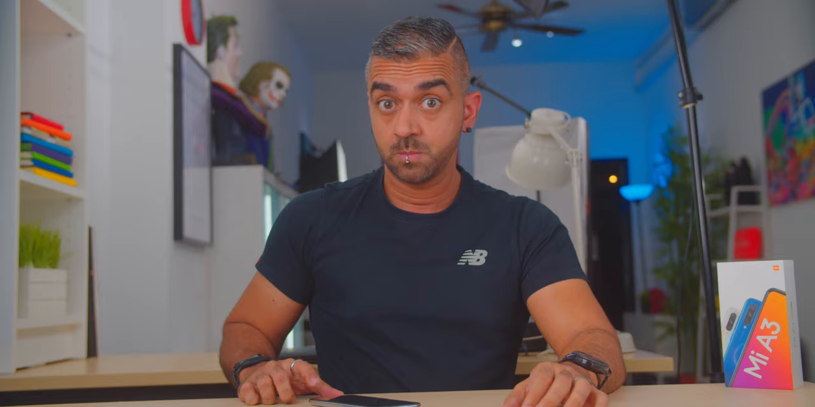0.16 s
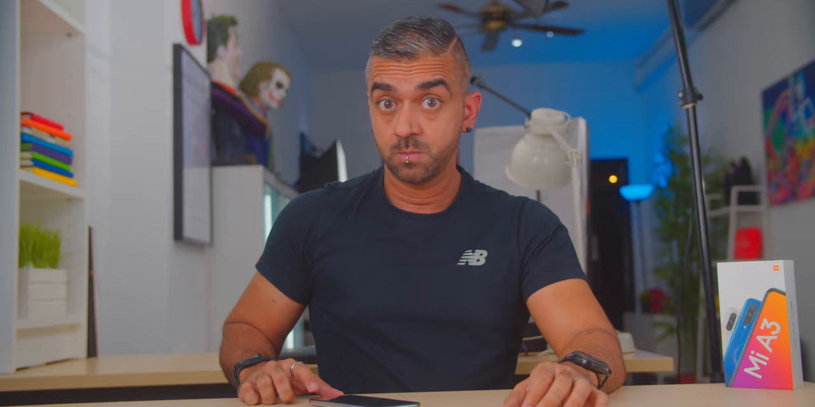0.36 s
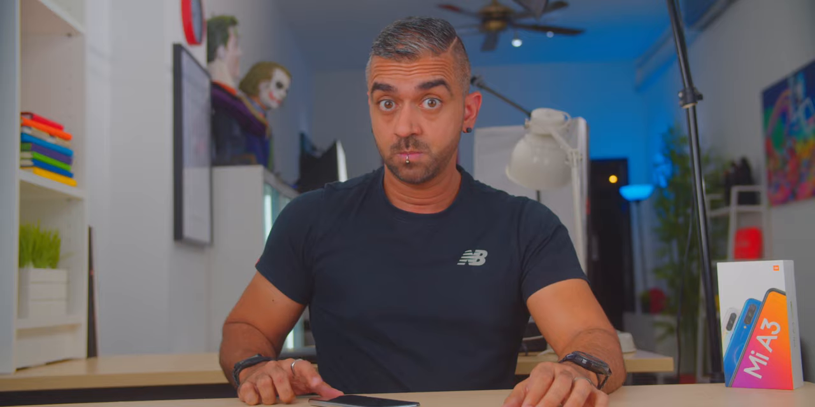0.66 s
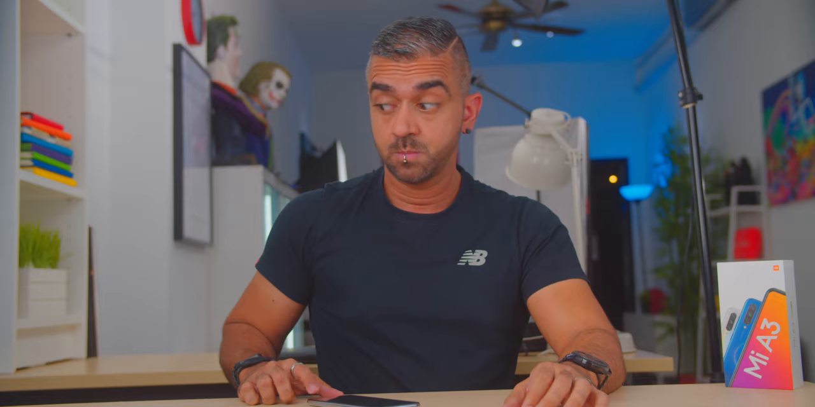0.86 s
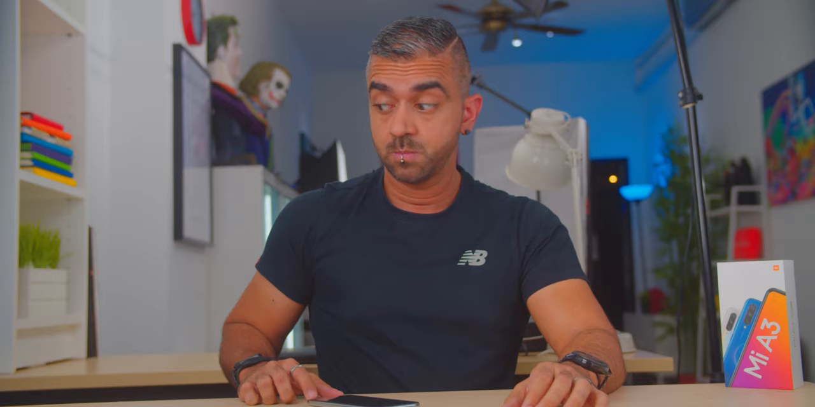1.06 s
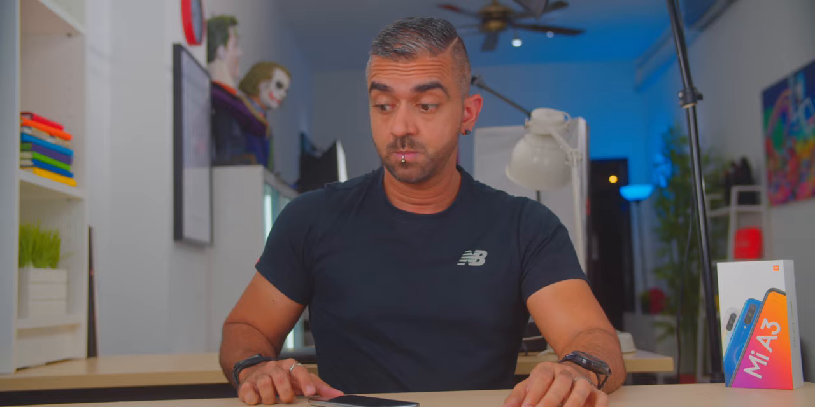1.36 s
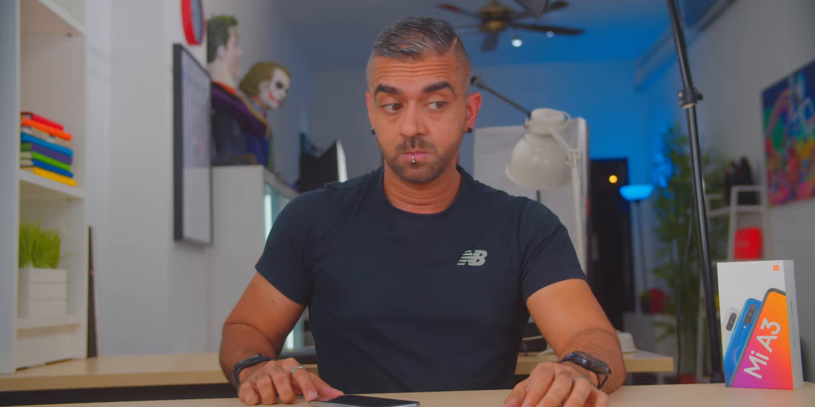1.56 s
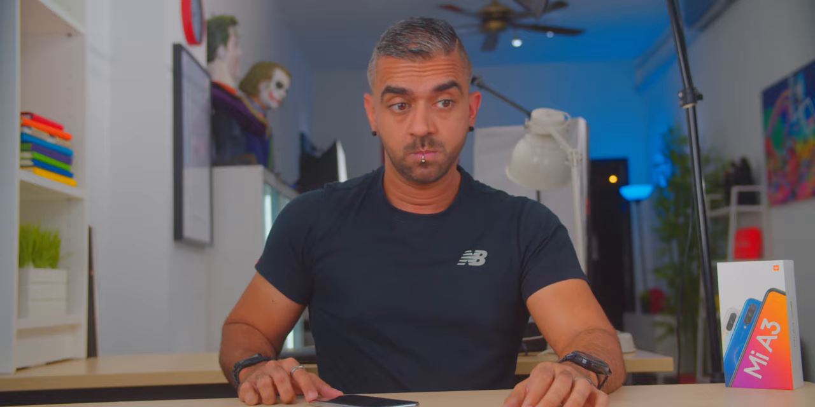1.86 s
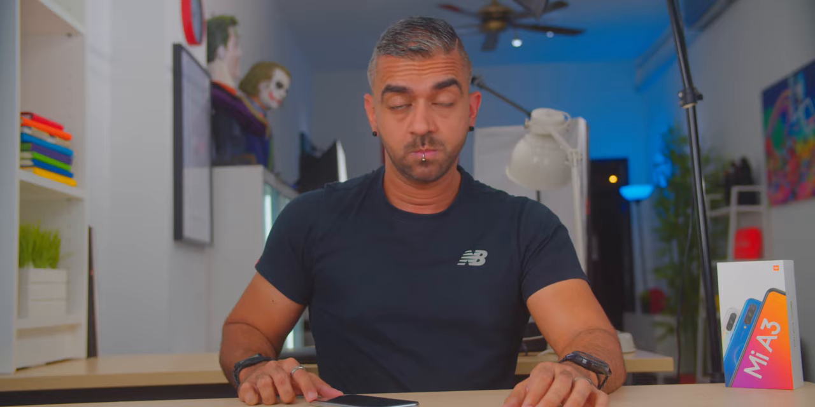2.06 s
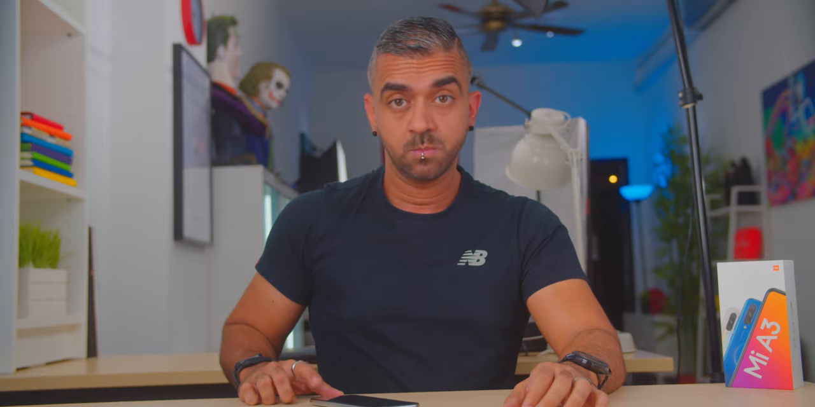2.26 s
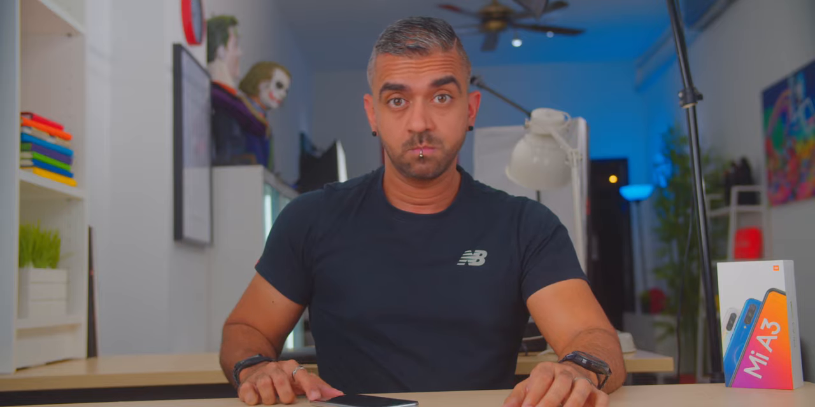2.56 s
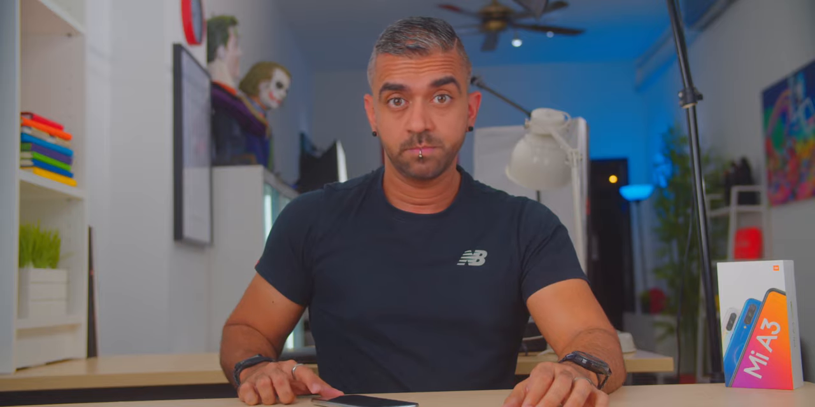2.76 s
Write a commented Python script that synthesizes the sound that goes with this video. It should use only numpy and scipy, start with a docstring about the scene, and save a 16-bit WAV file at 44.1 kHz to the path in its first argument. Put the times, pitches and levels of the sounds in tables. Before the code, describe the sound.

A phone wobbling on a wooden desk, heard close. Eleven bright, hard clacks fall almost evenly from 0.13 to 2.7 seconds, roughly every quarter second, slightly slower after 1.6. Each is followed about 0.03 seconds later by a softer, dull woody thud, sometimes with tiny ticks. The tail of an earlier knock opens it. A small furnished room echoes briefly over faint low rumble, hum and hiss.

```python
"""A phone lies on its camera bump on a wooden desk, close to the microphone, and a finger rocks it.
Each press leans on the desk, the free edge clacks down, and the other edge thuds back a moment later.
The desk top rings low and the phone shell clicks bright: both are sets of fading sine waves.
A small furnished room answers with fading noise, over a quiet floor of noise, hum and hiss."""
import sys
import numpy as np
from scipy import signal
from scipy.fft import rfft, irfft, next_fast_len
from scipy.io import wavfile

SR = 44100
rng = np.random.default_rng(int(sys.argv[2]) if len(sys.argv) > 2 else 0)


def attenuation_scalar(level_db):
    """Turn a level in dB into a linear amplitude multiplier (20 dB per decade)."""
    decades = np.asarray(level_db, float) / 20
    return 10 ** decades


def to_wav(sig):
    """Store sig (one row per channel, or 1-D mono) as 16-bit WAV at the path in sys.argv[1].

    Samples outside -1..1 are clipped; the rate is SR.
    """
    pcm = np.clip(np.atleast_2d(sig), -1, 1) * 32767
    pcm = np.round(pcm).astype(np.int16)
    wavfile.write(sys.argv[1], SR, pcm.T)  # frames by channels


N = 127890  # length in samples
PAD = SR // 4  # samples kept before the start, for blows whose tails are still heard
SCATTER_DB = 1  # how much the level of each ringing mode varies from blow to blow
CLACK_DESK_DB = 12  # extra desk ring in a clack; thuds send the room this much less


def along(points, hz):
    """Reads a curve of (pitch, value) points, with pitch on a log axis."""
    point_hz, value = np.transpose(points)
    return np.interp(np.log(hz + 1), np.log(point_hz + 1), value)


def push(length_s):
    """A smooth contact force that rises and falls; its samples add up to one."""
    force = np.hanning(max(round(length_s * SR), 1) + 2)
    return force / force.sum()


def ring(modes, scatter_db):
    """A struck body sounds as a sum of sine waves that each die away, with levels drawn anew."""
    t = np.arange(SR // 2) / SR
    pitch_hz, level_db, t60_s = np.transpose(modes)[:, :, None]
    level_db = level_db + scatter_db * rng.standard_normal(level_db.shape)
    fading = attenuation_scalar(level_db - 60 * t / t60_s)
    return (fading * np.sin(2 * np.pi * pitch_hz * t)).sum(0)


# ways the desk top rings: pitch_hz, level_db (relative), t60_s (time to fade by 60 dB)
DESK_MODES = [(60.6, -11.5, 0.31), (102.1, -16, 0.43), (139, -4, 0.05), (179.3, -14, 0.16),
              (224, -18.5, 0.53), (245.8, -4, 0.053), (267.4, -6, 0.14), (289, -22, 0.16),
              (325.3, -13.5, 0.32), (373.9, -13, 0.1), (436, -33, 0.094), (538.8, -14.5, 0.13),
              (652.6, -14, 0.13), (706, -18, 0.053), (1179, -11.5, 0.051), (1460, -8, 0.026),
              (1737, -18, 0.024)]


def desk_ring(force, scatter_db):
    """The wood's low ring, driven by a contact force: a longer push excites less treble."""
    return signal.fftconvolve(ring(DESK_MODES, scatter_db), force)


# ways the phone shell rings: pitch_hz, level_db (relative), t60_s (time to fade by 60 dB)
SHELL_MODES = [(1199, 9, 0.02), (2100, 0.5, 0.012), (3067, 5, 0.0045), (3340, 4.5, 0.0047),
               (3770, -28.5, 0.018), (5700, 6, 0.0045), (6354, -10, 0.014), (7560, 4, 0.0033),
               (9950, -15, 0.0051), (10540, 0.5, 0.0021), (11800, -44, 0.0065), (13500, -18, 0.013),
               (15300, -71, 0.0037)]


def shell_click(scatter_db):
    """The shell's bright ring after one contact; it builds up as the edge seats."""
    rise_s, shell_db = 0.0001, -4.5
    build_up = 1 - np.exp(-np.arange(SR // 2) / (rise_s * SR))
    return attenuation_scalar(shell_db) * ring(SHELL_MODES, scatter_db) * build_up


# how long the room rings: pitch_hz, t60_s (time to fade by 60 dB)
ROOM_FADE = [(60, 1), (200, 0.52), (500, 0.37), (1200, 0.58), (2500, 0.66), (6000, 0.6), (14000, 0.45)]
# how strongly the room answers a unit blow: pitch_hz, level_db (relative)
ROOM_COLOUR = [(40, 30), (100, 45), (250, 49), (400, 40.5), (700, 38.5), (1000, 32), (1400, 33), (2200, 23),
               (3300, 14.5), (4700, 7.5), (6000, 4.5), (9000, -4.5), (14000, -12)]


def room_tail():
    """Many mixed echoes act as noise in which each pitch dies at its own speed."""
    first_echo_s = 0.001915
    early_s, early_db = 0.053, 4  # extra dense echoes from things on and near the desk
    hz, t, z = signal.stft(rng.standard_normal(SR // 2), SR, nperseg=512)
    t60_s = along(ROOM_FADE, hz)[:, None]
    colour_db = along(ROOM_COLOUR, hz)[:, None]
    # the square root keeps the total energy independent of the fading time
    z = z * attenuation_scalar(colour_db - 60 * t / t60_s) * np.sqrt(6 * np.log(10) / (t60_s * SR))
    z = z * (1 + attenuation_scalar(early_db - 60 * t / early_s))
    tail = signal.istft(z, SR, nperseg=512)[1]
    return np.pad(tail, (round(first_echo_s * SR), 0))


def add(track, start_s, level_db, sound, room_force, room):
    """Lays a direct sound, and the room's answer to the force behind it, on the track."""
    same = 0.73  # share of the room's energy that repeats from blow to blow
    answer = np.sqrt(same) * room + np.sqrt(1 - same) * room_tail()
    for piece in sound, signal.fftconvolve(room_force, answer):
        part = track[round(start_s * SR) + PAD:][:len(piece)]
        part += attenuation_scalar(level_db) * piece[:len(part)]


# the free edge clacks down: start_s, level_db (relative), contact_s
CLACKS = [(0.1269, -32.5, 0.00037), (0.3704, -32.5, 0.0004), (0.614, -37, 0.0004), (0.8668, -32.5, 0.00031),
          (1.1253, -36, 0.00043), (1.3758, -35.5, 0.00033), (1.6404, -32.5, 0.00046), (1.928, -31, 0.00052),
          (2.2004, -34.5, 0.00047), (2.4599, -31, 0.00042), (2.707, -32, 0.00048)]
# one clack before the start, only its tail is heard: start_s, level_db (relative), contact_s
EARLIER_CLACK = (-0.19, -26.5, 0.00027)


def presses_and_clacks(track, room):
    """The finger loads the desk softly, then the edge strikes: desk and shell both ring."""
    press_lead_s, press_s, press_db = 0.0068, 0.0051, -8.5
    lead = round(press_lead_s * SR)
    press = attenuation_scalar(press_db) * push(press_s)
    for start_s, level_db, contact_s in [EARLIER_CLACK, *CLACKS]:
        blow = push(contact_s)
        force = np.zeros(lead + SR // 50)
        force[:len(press)] -= press
        force[lead:][:len(blow)] -= blow
        sound = attenuation_scalar(CLACK_DESK_DB) * desk_ring(force, SCATTER_DB)
        sound[lead:][:SR // 2] -= shell_click(SCATTER_DB)
        room_force = np.pad([1.], (lead, 0))  # the room answers the clack, not the press
        add(track, start_s - press_lead_s, level_db, sound, room_force, room)


# the other edge falls back softly: start_s, level_db (relative)
THUDS = [(-.097, -16.5), (0.153, -20.5), (0.3943, -17), (0.6345, -24), (0.893, -22), (1.1451, -23.5),
         (1.3994, -21), (1.669, -25), (1.9565, -27.5), (2.2292, -24.5), (2.4935, -19), (2.736, -21),
         (1.8, -33.5), (2.084, -38.5)]


def thuds(track, room):
    """A soft, longer contact rings the desk alone, so the thud is dull."""
    force = -push(0.0029)  # contact time in seconds
    for start_s, level_db in THUDS:
        sound = desk_ring(force, 2 * SCATTER_DB)
        add(track, start_s, level_db, sound, force * attenuation_scalar(-CLACK_DESK_DB), room)


# colour of the steady room noise: pitch_hz, level_db (per Hz, relative)
FLOOR_COLOUR = [(15, -30), (25, -4), (70, 19), (229, -8.5), (463, -13.5), (887, -15), (1370, -23),
                (4740, -42), (14400, -64), (16000, -71)]


def floor():
    """Steady noise shaped by pitch, a narrow band of noise as a wavering hum, and white hiss."""
    noise_db, hum_db = -49.5, -62.5
    hiss_db = -86  # microphone self-noise
    hum_hz, hum_width_hz = 227.5, 8.7  # half amplitude this far from the middle
    m = next_fast_len(N + 8192)
    hz = np.fft.rfftfreq(m, 1 / SR)
    noise = irfft(rfft(rng.standard_normal(m)) * attenuation_scalar(along(FLOOR_COLOUR, hz)), m)[:N]
    off = (hz - hum_hz) / hum_width_hz
    hum = irfft(rfft(rng.standard_normal(m)) / (1 + off ** 2), m)[:N]
    hiss = attenuation_scalar(hiss_db) * rng.standard_normal(N)
    return attenuation_scalar(hum_db) * hum / hum.std() + attenuation_scalar(noise_db) * noise / noise.std() + hiss


# small hard re-contacts of the shell: start_s, level_db (relative)
TICKS = [(0.1514, -65.5), (0.16, -44.5), (.396, -49.5), (0.4014, -46), (.632, -66), (0.6391, -51),
         (0.8975, -49), (1.4343, -65), (1.702, -72), (1.7992, -63), (2.4651, -41.5), (2.4943, -48),
         (2.5003, -45), (2.7119, -38.5), (2.7426, -76)]


def ticks(track, room):
    """A tiny hard contact rings the shell alone, and the room answers it."""
    for start_s, level_db in TICKS:
        add(track, start_s, level_db, shell_click(2 * SCATTER_DB), [1.], room)


def scene():
    """The rocking phone on the desk, over the room floor."""
    track, room = np.zeros(N + PAD), room_tail()
    presses_and_clacks(track, room)
    thuds(track, room)
    ticks(track, room)
    return (track[PAD:] + floor())[None]


def low_pass(x):
    """Removes everything above the highest recorded frequency."""
    return signal.sosfilt(signal.butter(12, 16490, fs=SR, output="sos"), x)


def record(dry):
    """The microphone loses the deepest bass, and nothing from the top limit up is kept."""
    bass_limit_hz, top_hz = 44.9, 16400
    roll_off = signal.butter(4, bass_limit_hz, "high", fs=SR, output="sos")
    heard = signal.sosfilt(roll_off, dry)
    hz = np.fft.rfftfreq(N, 1 / SR)
    mix = irfft(rfft(heard) * (hz < top_hz), N)
    return low_pass(mix)


dry = scene()
out = record(dry)
to_wav(out)
```